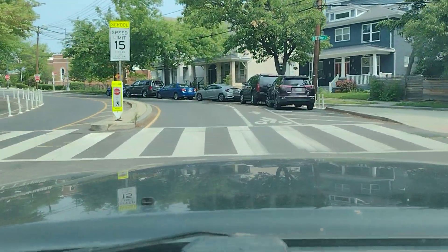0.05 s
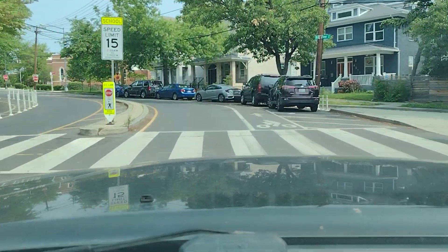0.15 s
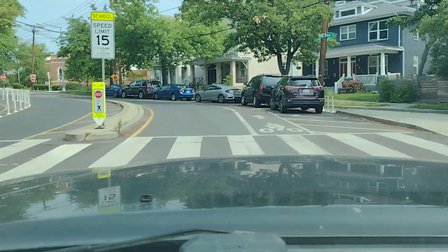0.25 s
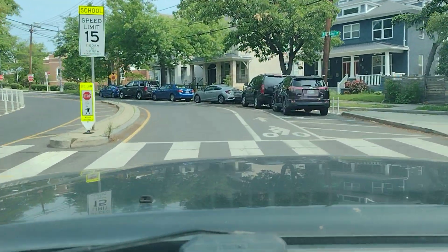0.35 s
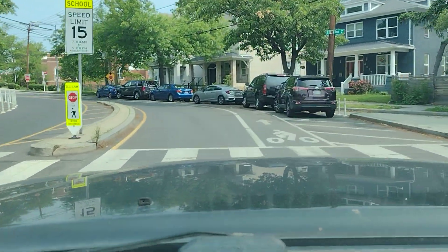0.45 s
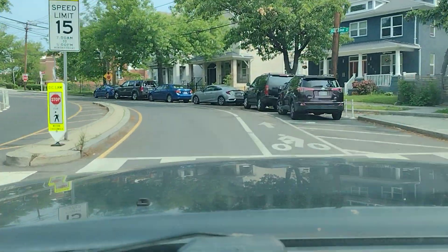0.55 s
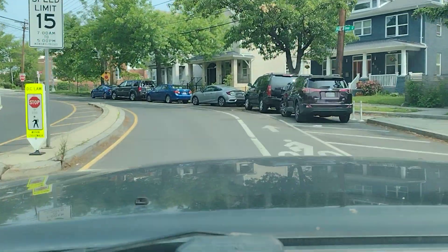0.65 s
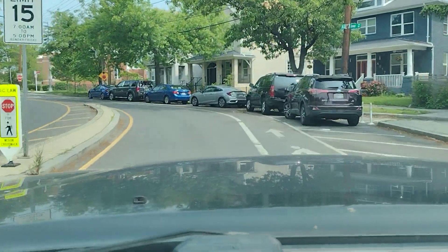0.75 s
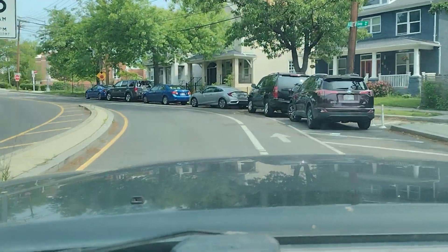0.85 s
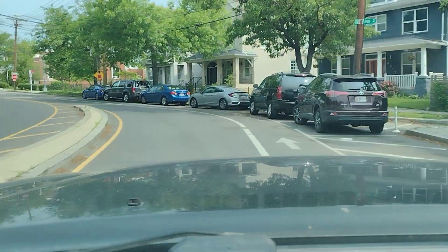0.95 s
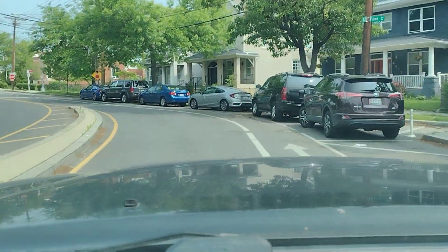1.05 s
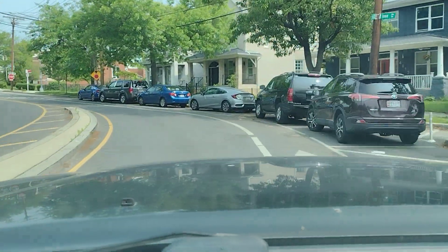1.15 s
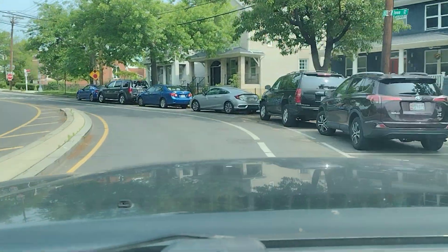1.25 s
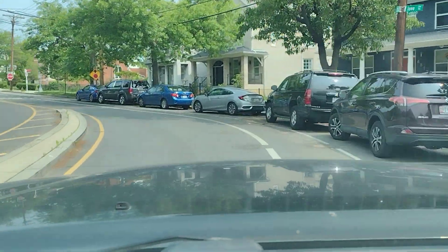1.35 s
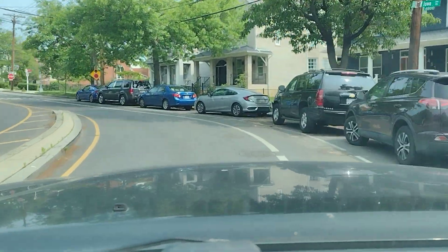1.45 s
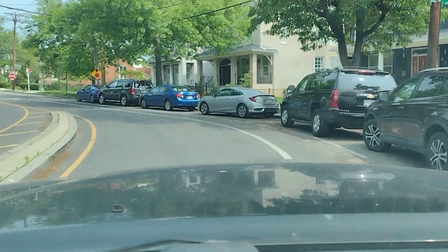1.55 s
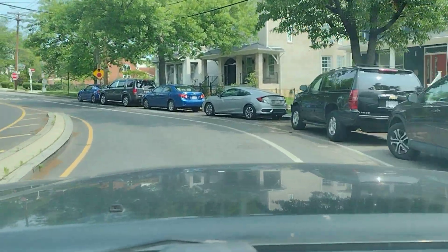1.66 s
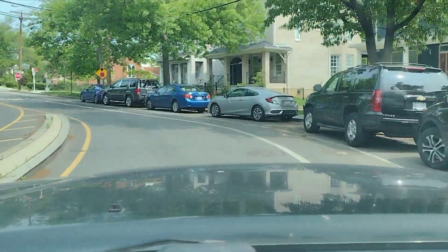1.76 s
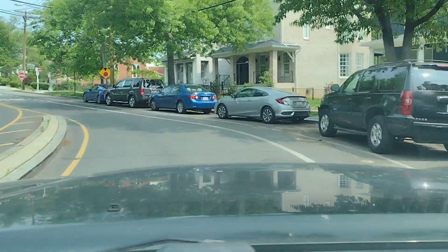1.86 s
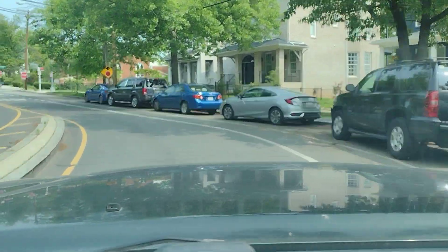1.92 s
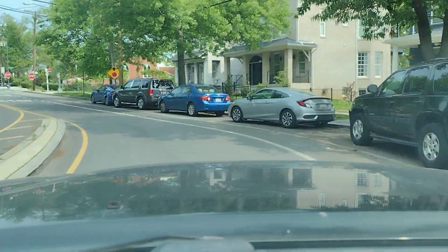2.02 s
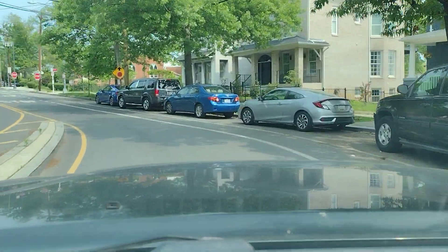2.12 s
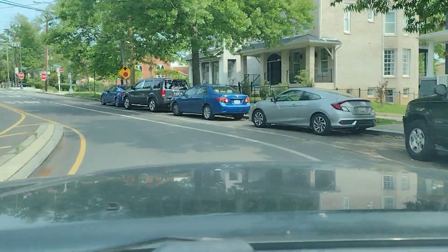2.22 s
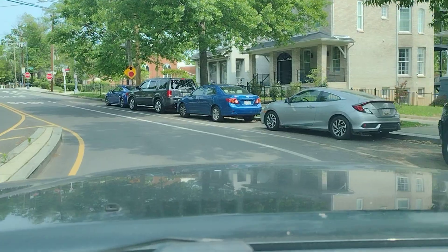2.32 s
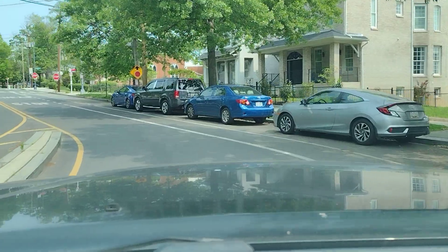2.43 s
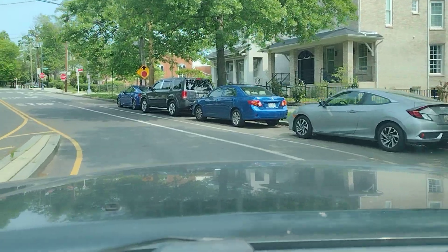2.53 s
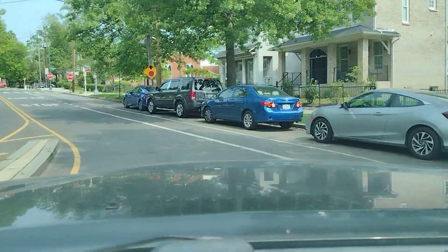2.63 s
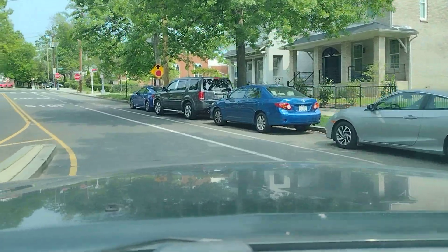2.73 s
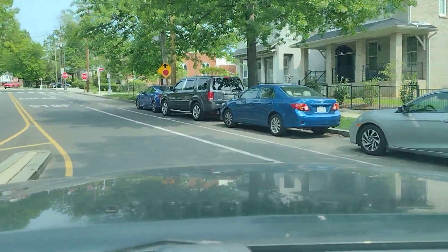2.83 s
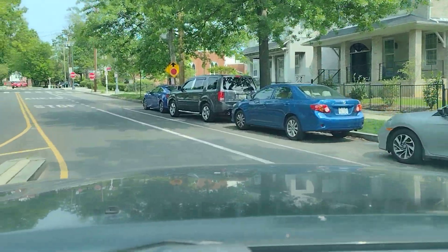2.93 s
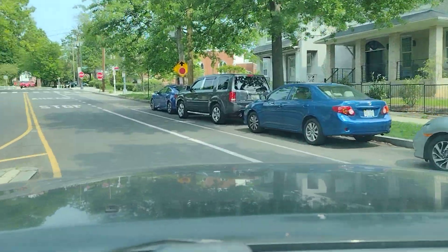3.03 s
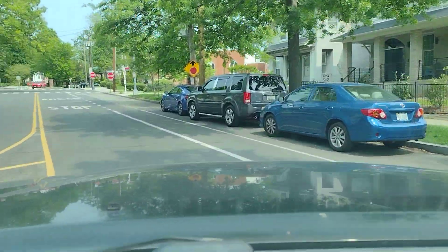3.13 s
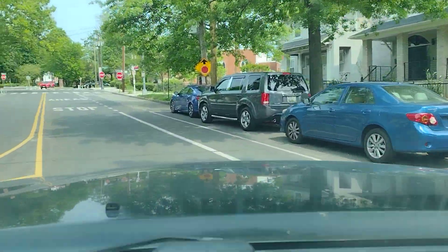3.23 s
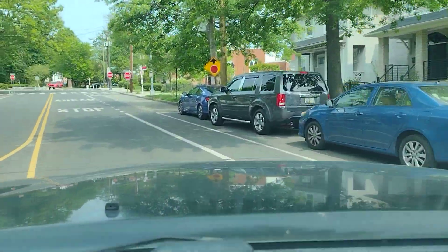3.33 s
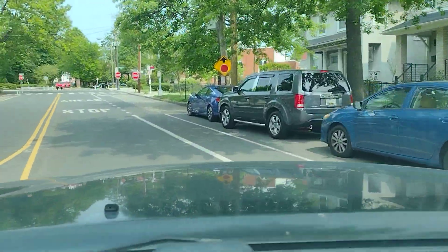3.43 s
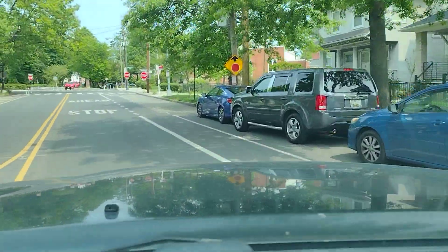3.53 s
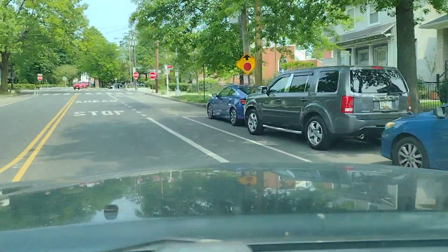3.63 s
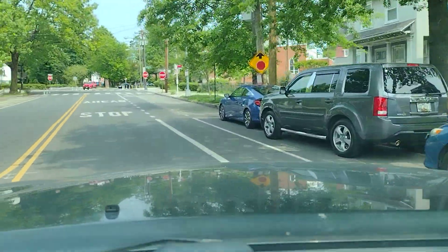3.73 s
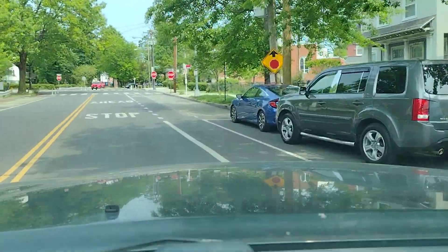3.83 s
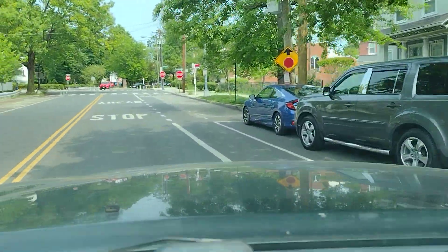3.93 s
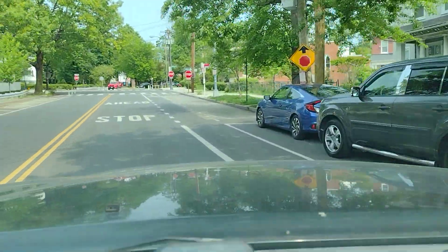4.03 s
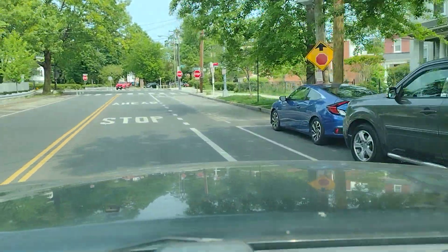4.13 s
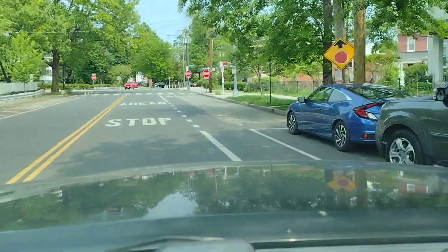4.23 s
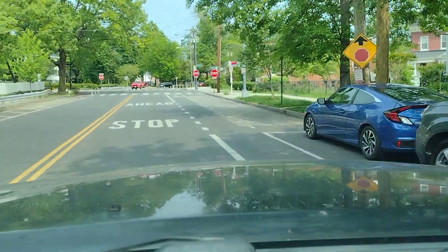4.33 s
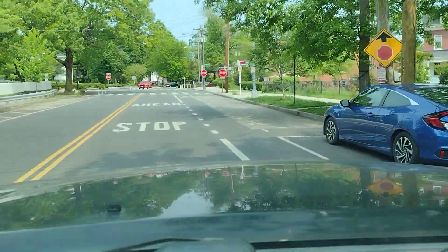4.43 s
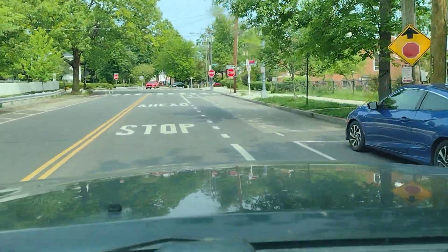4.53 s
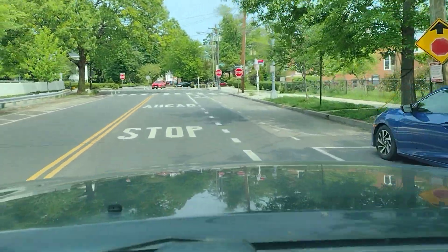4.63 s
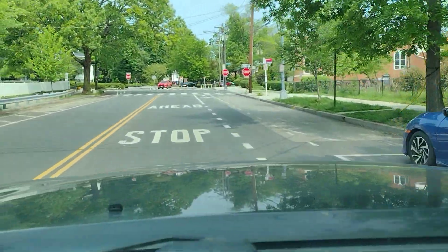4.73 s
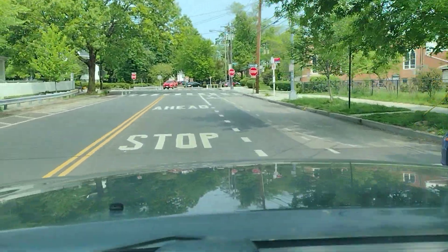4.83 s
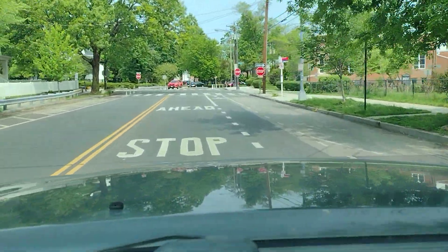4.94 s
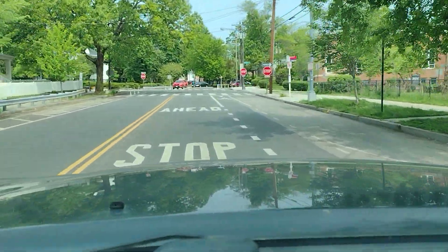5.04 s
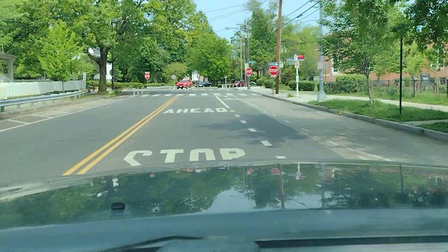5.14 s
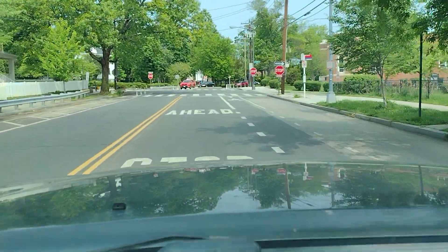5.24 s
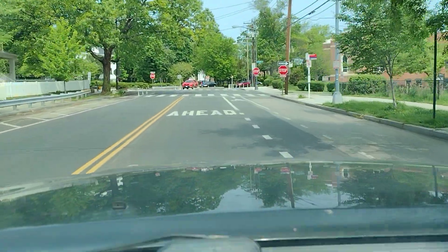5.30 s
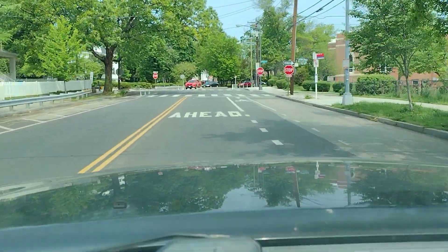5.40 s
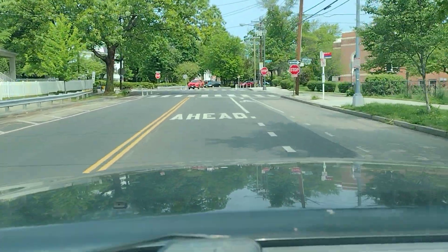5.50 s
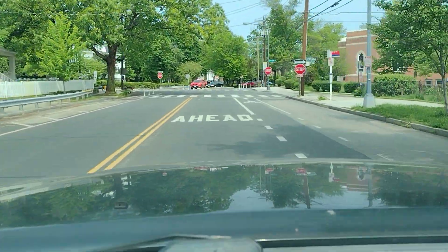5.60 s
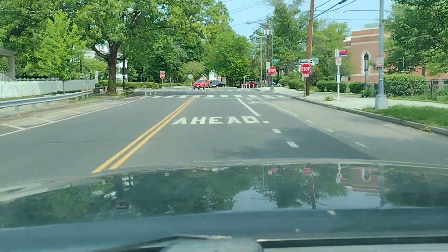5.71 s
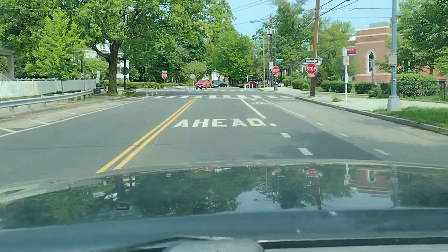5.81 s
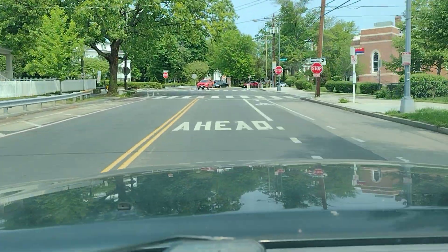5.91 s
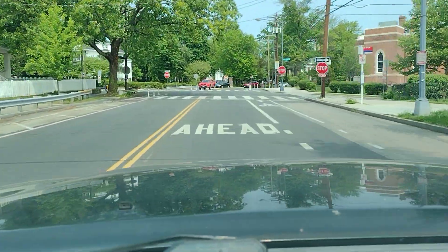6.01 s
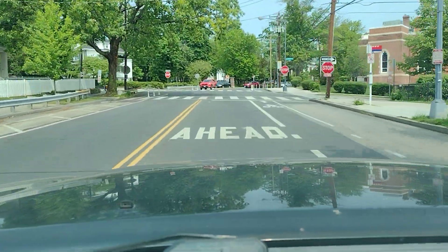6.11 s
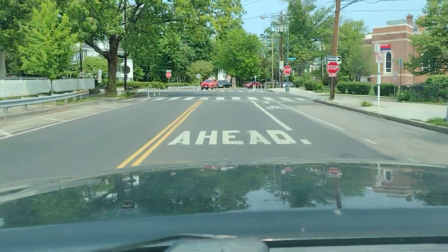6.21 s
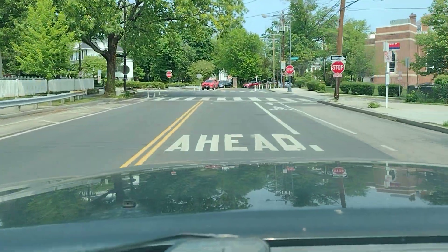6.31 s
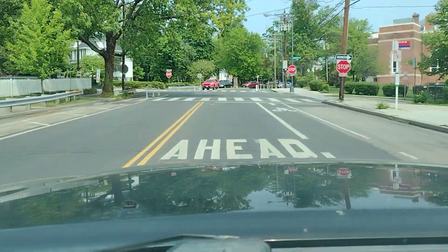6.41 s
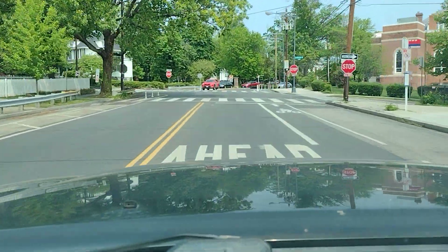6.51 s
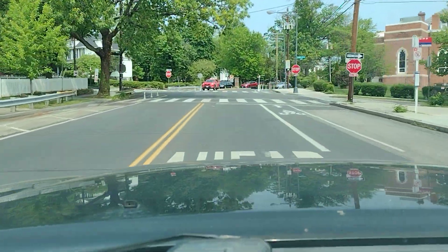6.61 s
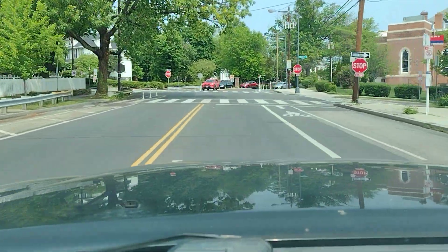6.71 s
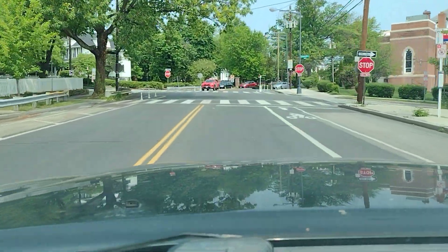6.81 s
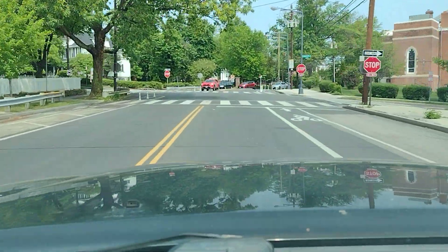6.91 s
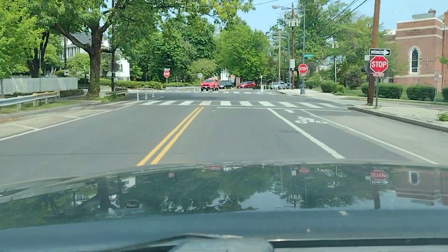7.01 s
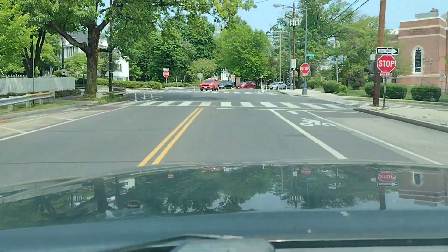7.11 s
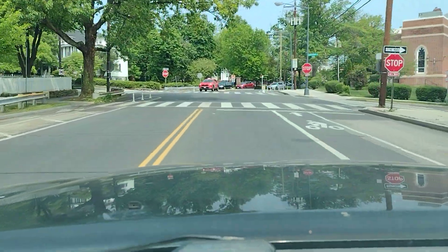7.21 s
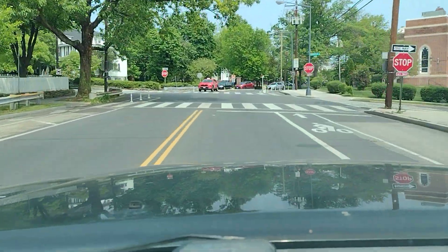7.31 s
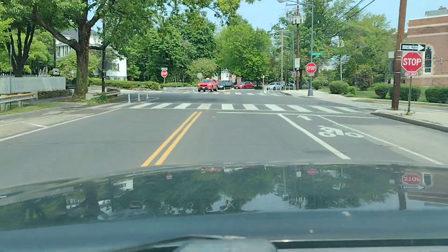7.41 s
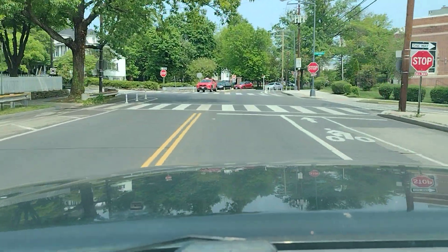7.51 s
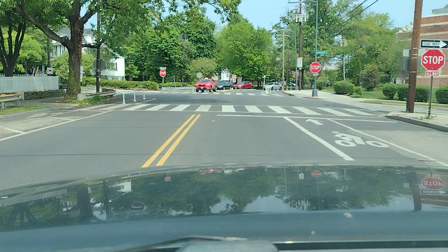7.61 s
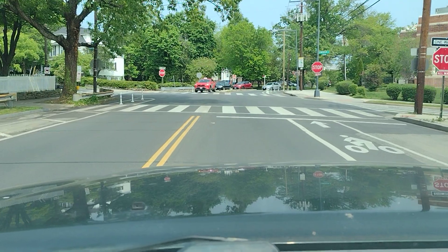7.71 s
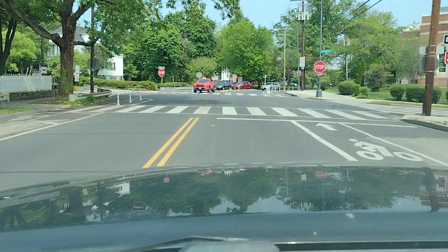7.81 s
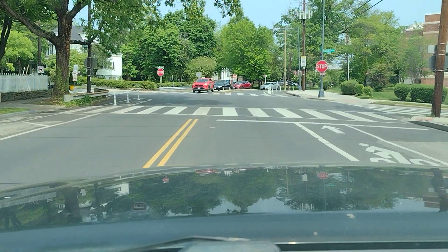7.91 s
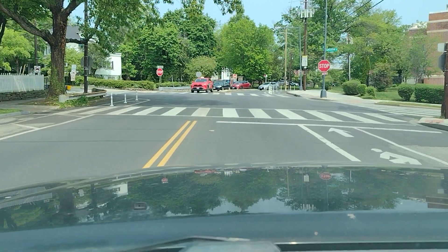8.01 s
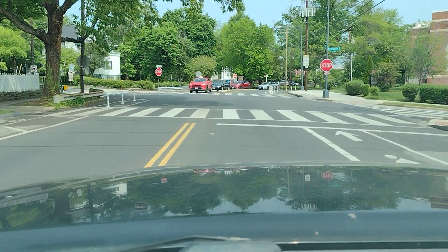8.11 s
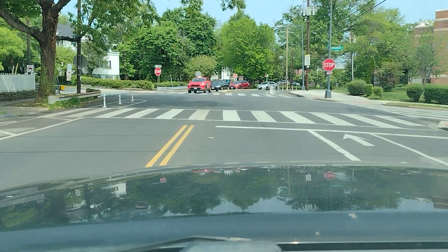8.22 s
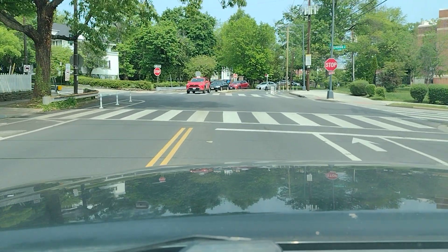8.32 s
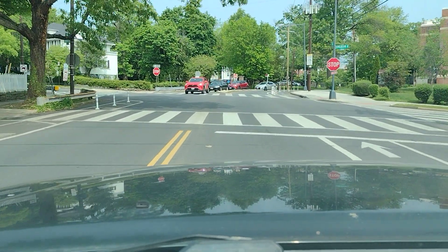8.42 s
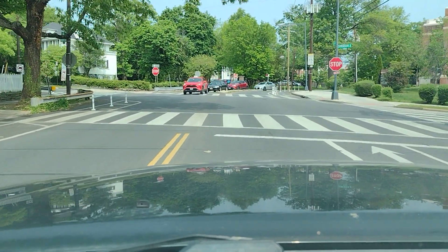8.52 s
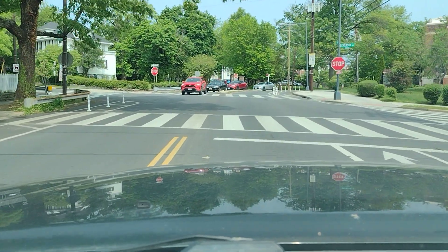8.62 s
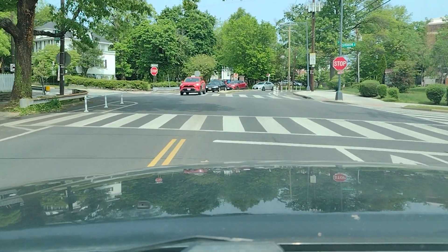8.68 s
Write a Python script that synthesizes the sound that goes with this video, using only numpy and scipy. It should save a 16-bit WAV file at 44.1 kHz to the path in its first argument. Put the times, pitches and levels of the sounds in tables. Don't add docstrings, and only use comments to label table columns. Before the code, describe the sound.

Heard from two spaced dashboard microphones, a car rolls along a leafy street. A low tyre drone pulses with every wheel turn over floor rumble, booming panels and grainy asphalt hiss. Loose trim ticks, mostly on the right, and a stone clicks in the tread. A faint bird whistles early on; near the end the drone sinks and the road noise softens while small chirps pass outside.

```python
import sys
import numpy as np
from scipy import signal
from scipy.fft import rfft, irfft, next_fast_len
from scipy.io import wavfile
from scipy.ndimage import uniform_filter1d, map_coordinates

SR = 44100
rng = np.random.default_rng(int(sys.argv[2]) if len(sys.argv) > 2 else 0)


def materialize(psi):
    bounded = np.clip(np.atleast_2d(psi).T, -1, 1)
    quanta = np.round(bounded * 32767).astype(np.int16)
    wavfile.write(sys.argv[1], SR, quanta)


def makeup_ratio(level_db):
    decades = np.asarray(level_db, float) / 20
    return 10 ** decades


N = 385875

# (time [s], roughness level [dB], draught level [dB])
ROAD = [(0.1, -48.5, -75.5), (0.62, -51.5, -80.5), (1.07, -48, -75.5), (1.36, -51, -79), (2.26, -50, -75),
        (2.46, -47.5, -73), (2.62, -46, -69.5), (2.81, -49, -70), (3.1, -47, -71.5), (3.93, -50.5, -77),
        (4.65, -49, -73), (4.91, -44.5, -71.5), (5.2, -49, -70.5), (5.55, -47.5, -66.5), (5.79, -51, -72.5),
        (6.25, -51, -77.5), (7.3, -54, -79), (8.65, -57.5, -85.5)]
# (time [s], pitch [Hz])
SPEED = [(0, 136), (2, 134), (4.2, 131), (5.9, 127.5), (6.8, 123.5), (7.3, 116.5), (8.1, 107), (8.7, 97.5)]
CRUISE_HZ = 133
# (centre [Hz], width [Hz], level [dB])
RESONANCES = [(224.7, 27, -7), (378, 18, -11), (723.5, 97, -14), (911, 95, -2.5), (1174, 90, -6.5),
              (1456, 19, 3.5), (1735, 120, -2.5), (2100, 120, -4)]
# (frequency [Hz], correlation [-1..1])
CABIN_ALIKE = [(100, .92), (190, .83), (260, .64), (350, .59), (470, .24), (630, -.28), (840, -.66),
               (1150, -.76), (1500, .14), (2700, 0)]
# (frequency [Hz], level [dB])
TRIM = [(300, -30), (550, 10.5), (1000, -1.5), (2400, -0.5), (3500, -8), (4500, -2), (6200, 5), (7500, -7),
        (10000, -17), (15700, -27.5)]


def unit(x):
    return x / np.sqrt(np.mean(x ** 2) + 1e-20)


def along(points, hz):
    f, v = np.transpose(points)
    return np.interp(np.log(hz + 1), np.log(f + 1), v)


def colour(points):
    return lambda hz: makeup_ratio(along(points, hz))


def curves(rows):
    s, *cols = np.transpose(rows)
    return [np.interp(np.arange(N) / SR, s, c) for c in cols]


def wobble(rate_hz):
    return map_coordinates(rng.standard_normal(N // 40), [np.arange(N) * rate_hz / SR])


def sine(hz, start_rad=0):
    return np.sin(2 * np.pi * np.cumsum(hz) / SR + start_rad)


def filtered(x, response):
    m = next_fast_len(N + SR // 2)
    return irfft(rfft(x, m) * response(np.fft.rfftfreq(m, 1 / SR)), m)[..., :N]


def sides(pan_db):
    return makeup_ratio(np.array([pan_db / 2, -pan_db / 2]))


def rush(gain, alike, patchy_db):
    z = signal.stft(rng.standard_normal((2, N)), nperseg=512)[2]
    field = uniform_filter1d(rng.standard_normal(z.shape[1:]), size=6, axis=0)
    field = uniform_filter1d(field, size=14, axis=1)
    pair = signal.istft(z * makeup_ratio(patchy_db * unit(field)), nperseg=512)[1][:, :N]

    def mid_side_gain(hz):
        turn_rad = np.arccos(np.clip(along(alike, hz), -1, 1)) / 2
        return gain(hz) * [np.cos(turn_rad), np.sin(turn_rad)]

    mid, side = filtered(pair, mid_side_gain)
    return unit(np.array([mid + side, mid - side]))


def add(out, s, sound):
    i = round(s * SR)
    part = out[:, max(i, 0):i + sound.shape[1]]
    part += sound[:, max(-i, 0):][:, :part.shape[1]]


def burst(t60_s):
    t = np.arange(SR // 40) / SR
    x = makeup_ratio(-60 * t / t60_s) * rng.standard_normal((2, len(t)))
    return x / np.linalg.norm(x, axis=1, keepdims=True)


def echoed(x, t60_s, wet_db):
    t = np.arange(SR // 2) / SR
    tail = rng.standard_normal((2, len(t))) * makeup_ratio(-60 * t / t60_s)
    tail = tail / np.linalg.norm(tail[0])
    return x + makeup_ratio(wet_db) * signal.fftconvolve(x, tail, axes=1)[:, :N]


def insect():
    # (middle [s], half length [s], level [dB])
    phrases = [
        (4.497, 0.24, -69),
        (5.102, .45, -69.5),
        (5.85, 0.16, -65.5),
        (6.25, 0.31, -70),
        (6.997, 0.088, -77),
    ]
    t = np.arange(N) / SR
    level = sum(makeup_ratio(db) * np.exp(-((t - s) / half_s) ** 4) for s, half_s, db in phrases)
    whine = rush(lambda f: 1 / (1 + ((f - 2670) / 22) ** 2), [(2670, 0.27)], patchy_db=-2.5)
    return level * whine * sides(3.9)[:, None]


def spray():
    # (peak time [s], peak level [dB], rise [dB/s], fall [dB/s])
    passes = [
        (5.42, -54, 150, 230),
        (5.28, -77, 160, 60),
        (5.55, -73, 200, 220),
        (7.11, -79, 120, 200),
        (7.52, -79, 120, 200),
    ]
    # (frequency [Hz], level [dB per Hz])
    mist = [(4000, -120), (5500, -16), (8000, -6), (11000, -7), (14500, 0), (15700, 1.5)]
    t = np.arange(N) / SR
    level = sum(makeup_ratio(db - np.maximum(rise * (s - t), fall * (t - s))) for s, db, rise, fall in passes)
    level = level * makeup_ratio(5.0 + 1.5 * wobble(70))
    return level * rush(colour(mist), [(9000, .2)], patchy_db=-1.5) * sides(9.4)[:, None]


def whistles():
    # (start [s], level [dB], left-right [dB])
    calls = [
        (-.14, -64, 1.5),
        (.292, -62.5, 1.5),
        (.722, -62, 2.5),
        (1.157, -60.5, 3),
        (1.587, -64.5, 1.5),
        (2.013, -66.5, 1.5),
    ]
    # (time [s], pitch [Hz], level [dB])
    slur = [(0, 4600, -12), (.008, 3550, -1), (.06, 2950, 0), (.135, 2400, -1), (.215, 1920, -1),
            (.27, 1650, -14)]
    at_s, hz, shape_db = np.transpose(slur)
    t = np.arange(round(at_s[-1] * SR)) / SR
    note = makeup_ratio(np.interp(t, at_s, shape_db)) * sine(np.interp(t, at_s, hz))
    out = np.zeros((2, N))
    for s, db, pan_db in calls:
        add(out, s, makeup_ratio(db + 7.5) * note * sides(pan_db)[:, None])
    flutter = np.array([.5 + .7 * wobble(110), .5 + .7 * wobble(110)]) * makeup_ratio(1.2 * wobble(25))
    return echoed(out * flutter, t60_s=.45, wet_db=-1)


def chirps():
    # (start [s], length [s], from [Hz], to [Hz], level [dB])
    calls = [(1.31, .06, 9000, 7900, -82.5), (1.76, 0.044, 8500, 7800, -82.5), (2.74, .09, 4730, 3800, -73),
             (3.55, .03, 4300, 4590, -70), (3.552, .07, 4980, 5000, -75), (3.61, 0.054, 4390, 3560, -67),
             (4.46, .08, 5120, 3700, -71), (7.495, 0.025, 5030, 4840, -70), (8.3, .07, 3970, 4700, -67),
             (8.327, 0.037, 3680, 4630, -63), (8.329, .045, 4700, 5070, -64), (8.354, .03, 4200, 3390, -59),
             (8.373, 0.048, 4120, 3000, -61), (8.347, 0.1, 4600, 4030, -68.5)]
    out = np.zeros((2, N))
    for s, length_s, from_hz, to_hz, db in calls:
        u = np.linspace(0, 1, round(length_s * SR))
        chirp = np.sin(np.pi * u) * sine(from_hz + (to_hz - from_hz) * u)
        add(out, s, makeup_ratio(db - 0.5) * chirp * sides(3)[:, None])
    hoarse = .5 + .85 * wobble(600)
    return echoed(out * hoarse, t60_s=.7, wet_db=3)


def engine():
    # (time [s], firing order [Hz], level [dB])
    order = [(0, 184, -78), (1.2, 186, -43), (2, 183, -46.5), (3, 176, -55), (4, 177, -39.5),
             (5, 183, -42.5), (5.8, 178, -43), (6.3, 170, -71)]
    hz, level_db = curves(order)
    return makeup_ratio(level_db + 2.6 * wobble(4.7)) * sine(hz)


def rattle():
    taps_per_s = np.array([[35], [110]])
    taps = (rng.random((2, N)) < taps_per_s / SR) * makeup_ratio(2.5 * rng.standard_exponential((2, N)))
    patter = signal.fftconvolve(taps, burst(.012), axes=1)[:, :N]
    ring = lambda f: colour(TRIM)(f) / (1 + (3800 / (f + 1)) ** 6)
    draught_db = curves(ROAD)[1]
    return makeup_ratio(draught_db + 25.5) * filtered(patter, ring)


def stone():
    # (time [s], peak level [dB])
    strikes = [(0.848, -57), (2.2167, -72), (2.4704, -70), (2.738, -72), (2.891, -64.5), (3.2738, -61.5),
               (3.8492, -71), (4.347, -61), (4.6157, -75.5), (4.8903, -62.5), (5.1607, -64), (5.7159, -57),
               (7.1603, -60), (7.3823, -61.5)]
    out = np.zeros((2, N))
    for s, db in strikes:
        add(out, s, makeup_ratio(db + 18.5) * burst(.012) * sides(-17.5)[:, None])
    return filtered(out, lambda f: 1 / (1 + (12500 / (f + 1)) ** 12))


def trim_ticks():
    # (time [s], snap [dB], knock [dB], left-right [dB])
    singles = [(0.165, -66, -39.5, -13), (0.2537, -55.5, -51.5, -6), (0.266, -65, -52.5, 8),
               (0.344, -59, -32.5, -8.5), (0.4715, -70, -57, -18), (0.6438, -68, -52, 12),
               (0.7128, -63.5, -49, 7), (0.848, -64, -54, -11.5), (0.9087, -50.5, -33, -18),
               (0.9448, -56.5, -46, -1), (1.002, -40.5, -25.5, -15.5), (1.0156, -65, -52.5, 12),
               (1.0502, -55.5, -34.5, -16), (1.0976, -42, -25.5, -15.5), (1.298, -61, -45.5, -1),
               (1.3494, -64, -47, 14), (1.98, -56, -45.5, -12.5), (2.1989, -58.5, -40, 16),
               (2.7697, -51, -55.5, -3), (2.895, -55.5, -54, 1.5), (3.206, -63.5, -50, -14.5),
               (3.3598, -58, -55.5, 1.5), (3.79, -62.5, -47.5, -13), (4.7357, -60, -43, 5.5),
               (6.1751, -67, -41.5, 13), (6.211, -58, -50, -5), (6.565, -55, -52.5, -0.5),
               (7.442, -55.5, -57, 4), (7.6963, -59.5, -59, -8), (7.9492, -61.5, -45, 12)]
    # (first tick [s], gap [s], ticks, snap [dB], knock [dB])
    chatter = [
        (0.538, .092, 4, -62, -45),
        (0.7675, .0927, 6, -64, -50),
        (1.4975, .0462, 5, -65, -47),
        (1.878, .047, 2, -68, -52),
        (.0728, .0526, 3, -66, -52),
        (2.853, .0925, 8, -63, -46),
        (4.115, .0497, 6, -66, -54),
        (4.7465, .092, 4, -63, -48),
        (6.616, .063, 2, -68, -56),
        (7.3846, .0727, 2, -70, -54),
    ]
    runs = []
    for first_s, gap_s, many, snap_db, knock_db in chatter:
        for k in range(many):
            snap_scatter_db, knock_scatter_db = 3.5 * rng.standard_normal(2)
            runs.append((first_s + k * gap_s, snap_db + snap_scatter_db, knock_db + knock_scatter_db, -13.5))
    snaps, knocks = np.zeros((2, 2, N))
    for s, snap_db, knock_db, pan_db in list(singles) + runs:
        add(snaps, s, makeup_ratio(snap_db + 22) * sides(pan_db)[:, None] * burst(.016))
        add(knocks, s, makeup_ratio(knock_db + 27) * sides(.7 * pan_db)[:, None] * burst(.022))
    low_pass = lambda f: 1 / (1 + (f / 3300) ** 6)
    snaps = filtered(snaps, lambda f: colour(TRIM)(f) * (1 - low_pass(f)))
    return snaps + filtered(knocks, lambda f: colour(TRIM)(f) * low_pass(f))


def window_air():
    # (frequency [Hz], level [dB per Hz])
    air = [(2400, -64), (3200, -6.5), (4000, -4), (5000, -10), (6200, -9.5), (7000, -15.5), (8500, -20),
           (9500, -28), (12000, -32), (14000, -24.5), (15700, -24)]
    level = makeup_ratio(curves(ROAD)[1] + 3.5 + .4 * wobble(3.9))
    return level * rush(colour(air), [(4000, 0.037)], patchy_db=2.0) * sides(-1.0)[:, None]


def floor_rumble(bumps):
    # (frequency [Hz], level [dB per Hz])
    rumble = [(12, -55.5), (20, -26.5), (30, -14), (38, -7), (50, -10.5), (65, -1), (86, -9), (100, -1.5),
              (130, -36.5), (220, -120)]
    # (time [s], swell [dB])
    dips = [
        (0.05, 4.5),
        (1.1, 5),
        (1.38, 7),
        (3.3, 0.5),
        (3.65, 4.5),
        (3.95, 6),
        (4.5, 5.5),
        (5.2, 2),
        (6.12, 5.5),
        (6.74, 6),
    ]
    t = np.arange(N) / SR
    level_db = -37 + 0.18 * (curves(SPEED)[0] - CRUISE_HZ)
    level_db = level_db + sum(db * np.exp(-((t - s) / .17) ** 2) for s, db in dips)
    level = makeup_ratio(level_db + .8 * bumps + .8 * wobble(9))
    return level * rush(colour(rumble), [(25, .96), (90, .91)], patchy_db=.6)


def resonance(f):
    return sum(makeup_ratio(db) * w * w / (w * w + 4 * (f - c) ** 2) for c, w, db in RESONANCES)


def body_panels(bumps):
    # (frequency [Hz], level [dB per Hz])
    body = [(70, -57.5), (110, -5), (150, -1.5), (205, -12), (255, -14), (300, -11.5), (350, -18.5),
            (450, -17), (540, -25.5), (700, -50), (1200, -120)]
    cruise_roughness_db = -49
    level_db = -40 + 0.15 * (curves(SPEED)[0] - CRUISE_HZ)
    level_db = level_db + 0.14 * (curves(ROAD)[0] - cruise_roughness_db)
    boom = rush(lambda f: colour(body)(f) * (1 + 1.8 * resonance(f)), CABIN_ALIKE, patchy_db=0.52)
    return makeup_ratio(level_db + 5.5 + 0.23 * bumps) * boom


def tyre_hiss():
    # (frequency [Hz], level [dB per Hz])
    grain = [(300, -61.5), (480, -8.5), (600, 0.5), (900, 0), (1070, -4.5), (1320, -10), (1900, -15.5),
             (2150, -17), (2750, -17.5), (3160, -27), (4100, -59), (7000, -120)]
    level = makeup_ratio(curves(ROAD)[0] + 5.5 + 0.18 * wobble(5.1))
    return level * rush(lambda f: colour(grain)(f) * (1 + 1.2 * resonance(f)), CABIN_ALIKE, patchy_db=0.93)


def tread():
    # (time [s], level [dB])
    load = [(0.12, -32), (0.63, -35), (0.91, -28.5), (1.17, -26), (1.45, -24.5), (1.72, -26), (1.99, -22.5),
            (2.25, -23.5), (2.79, -23.5), (3.06, -23.5), (4.17, -21.5), (5.04, -25.5), (5.59, -23),
            (6.2, -36.5), (6.76, -28.5), (7.74, -30.5), (8.3, -28), (8.62, -32.5)]
    # (time [s], wheel turns so far)
    wheel = [(-.152, -1), (1.991, 7), (3.874, 14), (5.921, 21), (7.329, 26), (8.01, 27.45), (9, 29.45)]
    # (time [s], left-right [dB], left lag [rad])
    lean = [(0, 1.2, .3), (1.5, 2.9, .42), (3.2, 2.9, .42), (5, 2.1, .42), (6.5, .4, .38), (7.3, -.4, .35),
            (7.8, -1.5, -.28), (8.75, -1.2, -.1)]
    (hz,), (level_db,), (turns,) = curves(SPEED), curves(load), curves(wheel)
    pan_db, lag_rad = curves(lean)
    ears_rad = np.array([-lag_rad / 2, lag_rad / 2])
    place = (turns + 0.551) % 1 * 2 - 1
    seam = makeup_ratio(-20 * np.abs(place) ** 8.0 - 0.93 * place + 1.1 * wobble(22))
    block_hz = hz * (1.012 - .07 * place + .006 * wobble(14))
    drone = seam * np.sqrt(2) * sine(block_hz, ears_rad + 4.18)
    carrier = np.exp(2j * np.pi * np.cumsum(hz * .95) / SR + 1j * ears_rad)
    blur = filtered(rng.standard_normal((2, N)), lambda f: 1 / (1 + (f / 22) ** 4))
    others = unit(np.real((blur[0] + 1j * blur[1]) * carrier))
    blur_db = -8 + np.clip((130 - hz) * .8, 0, 5)
    smooth_db = uniform_filter1d(level_db, size=SR // 2)
    return sides(pan_db) * (makeup_ratio(level_db + 0.5) * drone + makeup_ratio(smooth_db + blur_db) * others)


def scene():
    bumps = wobble(2.8)
    street = insect() + spray() + whistles() + chirps()
    cabin = engine() + rattle() + stone() + trim_ticks() + window_air()
    return street + cabin + floor_rumble(bumps) + body_panels(bumps) + tyre_hiss() + tread()


def band_limit(x):
    return signal.sosfilt(signal.butter(12, 15780, fs=SR, output="sos"), x)


def record(dry):
    # (frequency [Hz], level [dB per Hz])
    self_noise = [(1500, -120), (3000, 0), (7000, -5), (9000, -7.5), (11500, -8.5), (13500, -8),
                  (15700, -7.5)]
    own = makeup_ratio(-78.0) * rush(colour(self_noise), [(8000, 0.13)], patchy_db=-0.3)
    return band_limit(dry + own)


dry = scene()
out = record(dry)
materialize(out)
```